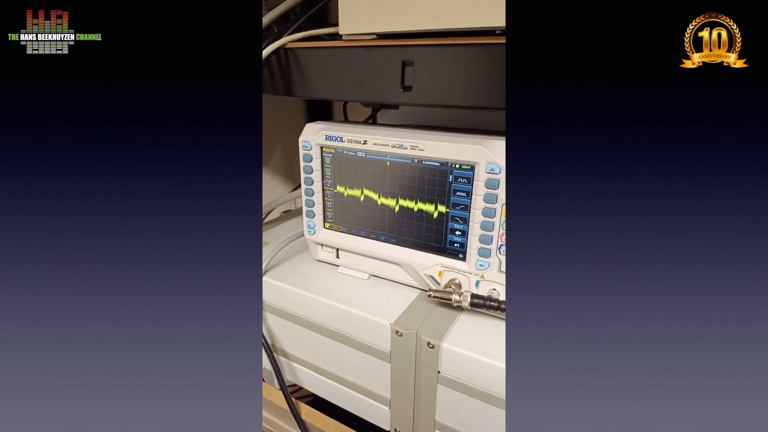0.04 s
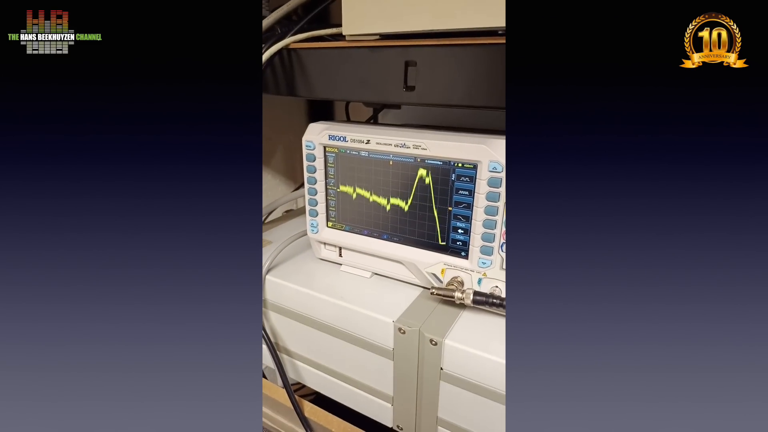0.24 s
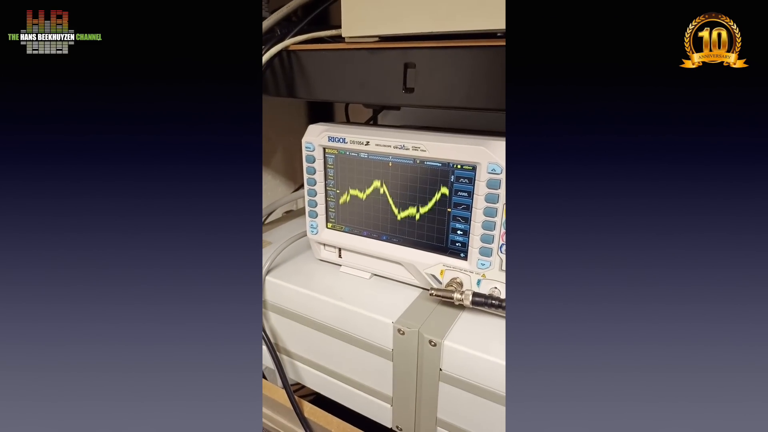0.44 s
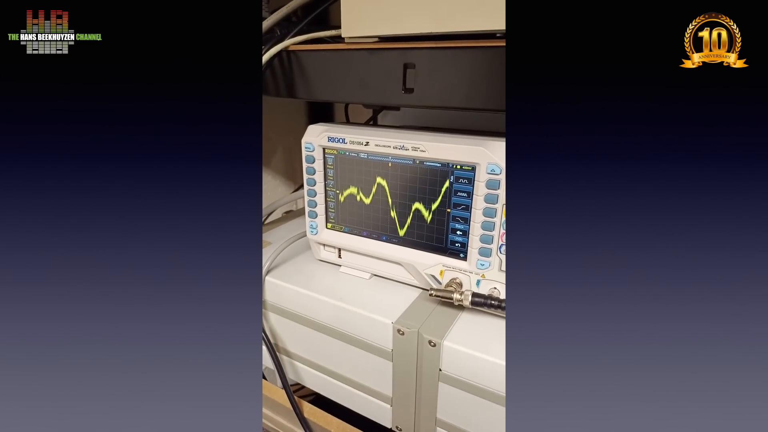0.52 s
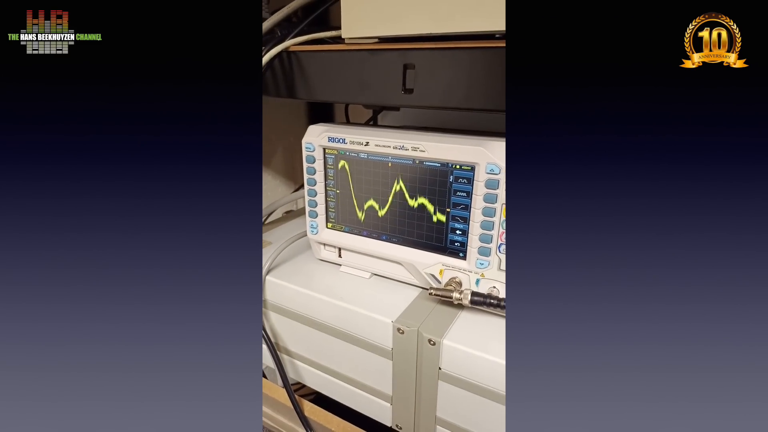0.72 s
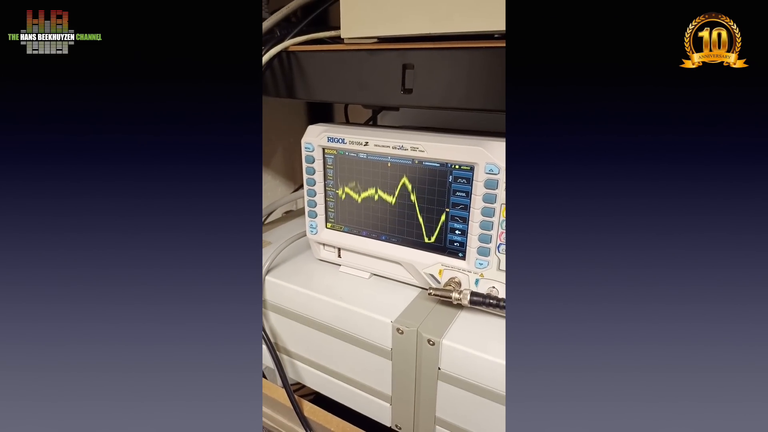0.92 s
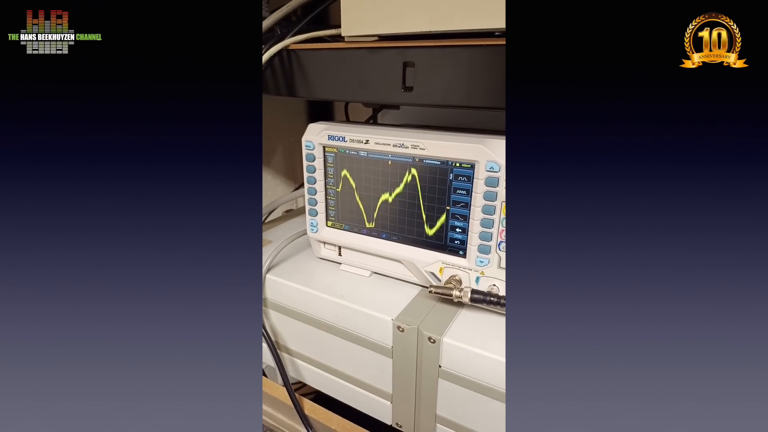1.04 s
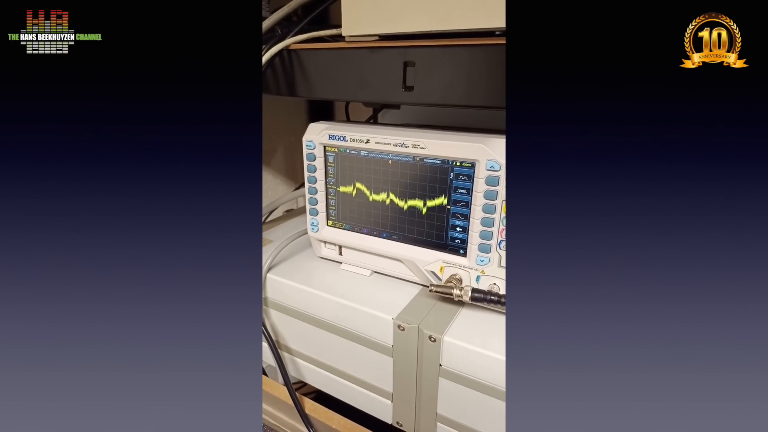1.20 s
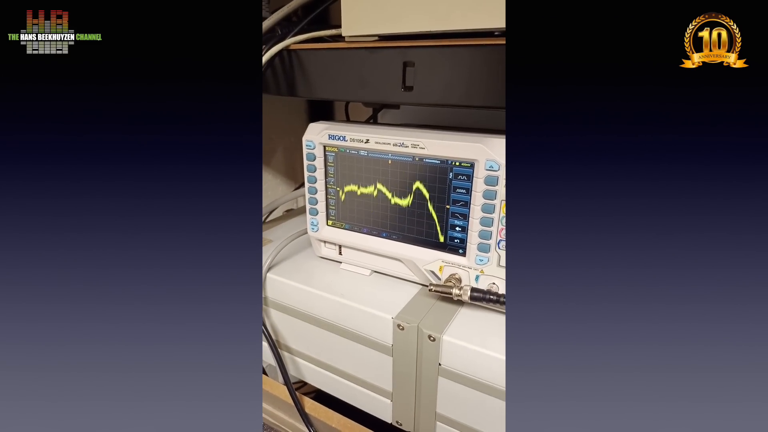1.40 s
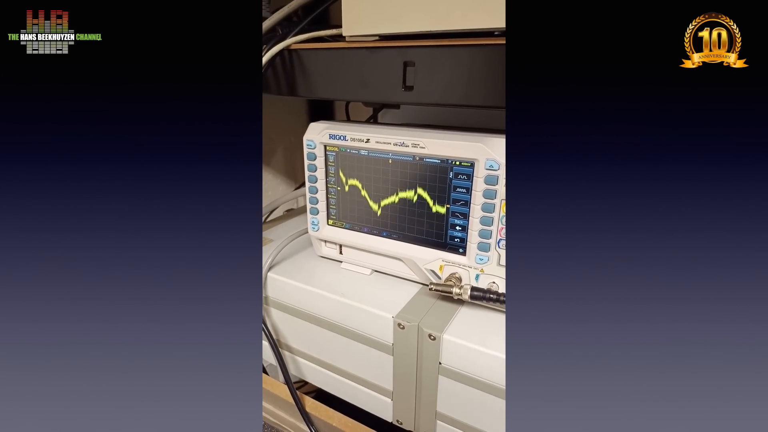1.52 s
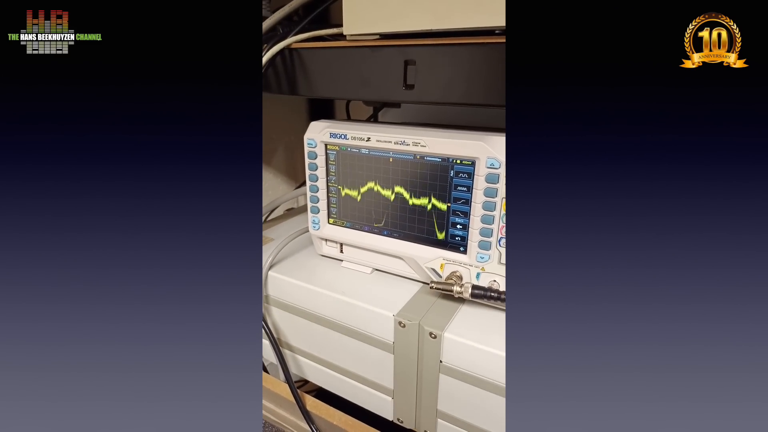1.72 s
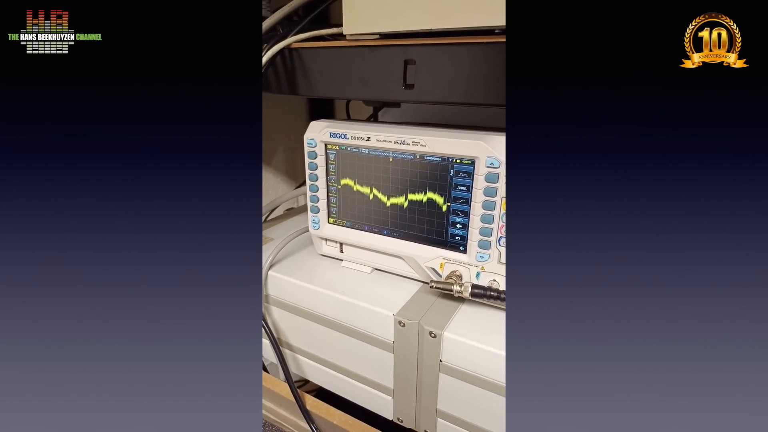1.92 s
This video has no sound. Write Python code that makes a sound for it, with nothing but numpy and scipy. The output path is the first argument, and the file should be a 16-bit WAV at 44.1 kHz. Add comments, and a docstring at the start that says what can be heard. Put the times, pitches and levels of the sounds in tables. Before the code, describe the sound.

A run of dull, hollow knocks near electronic equipment, with fans faintly hissing behind.

```python
"""Knocks among running instruments

A small room, cooling fans hissing and whining steadily behind, one high whistle swelling and fading.
Close to the microphone, eight quick, dull knocks land on a hollow case or bench among electronic
instruments, the first two hardest. Each soft contact sets the same low modes booming, with a faint
scuff, a brief clack and a short room tail. The microphone loses the deep bass."""
import sys
import numpy as np
from scipy import signal
from scipy.fft import rfft, irfft
from scipy.io import wavfile

SR = 44100
rng = np.random.default_rng(int(sys.argv[2]) if len(sys.argv) > 2 else 0)


def to_wav(s):
    """Save 16-bit WAV."""
    ch = np.atleast_2d(s).T  # columns
    pcm = np.round(np.clip(ch, -1, 1) * 32767)  # PCM
    wavfile.write(sys.argv[1], SR, pcm.astype(np.int16))


N = 85995

# Air rushing through the fans: f/Hz, relative level/dB
AIR_SPECTRUM = [(25, -3), (60, -6), (120, -0.5), (250, -4), (400, 3.5), (560, -4), (850, 0.5), (1100, -4),
                (1900, -4.5), (3000, -7.5), (4500, -8), (6200, -12), (7200, -25.5), (8200, -33.5),
                (9500, -33.5), (10300, -22), (11800, -32)]
# Steady whine of the fans: f/Hz, level/dB
FAN_TONES = [(419, -62.5), (764.6, -63), (875, -73), (1313, -68), (1532, -98), (1686, -80), (2297, -69.5),
             (3063, -77), (3957, -96), (7452, -93), (10066, -93), (11521, -91.5)]
# Swell of the fan whistle: t/s, level/dB
WHISTLE_SWELL = [(0, -70.5), (.3, -69.5), (.45, -76.5), (0.622, -67), (0.798, -75), (0.949, -74),
                 (1.079, -69.5), (1.23, -68.5), (1.348, -72.5), (1.95, -77.5)]
# Knocks: t/s, strength/dB, contact softness/ms, first touch/dB re the knock, scuff/dB, ring time factor
KNOCKS = [(0.2015, 14.5, 0.4, -15.5, -41.5, 0.95), (0.4166, 9.5, 0.63, -8, -47.5, 0.79),
          (0.5947, -1.1, 0.52, -16, -53.5, 1.14), (0.7804, -0.3, 0.4, -24.5, -51, 1.13),
          (0.9684, 0, 0.43, -18, -57, 1.06), (1.1592, -0.9, 0.49, -24, -59, 1.05),
          (1.348, -0.54, 0.39, -17, -54, 1.05), (1.5526, 1.1, 0.37, -10.5, -51, 1.03)]
# Modes of the hollow body, with the room's lingering bass resonances in the lowest three rows:
# f/Hz, level/dB, t60/s, polarity at the microphone
BODY_AND_ROOM_MODES = [(59.6, -51, 0.65, -1), (79.8, -49, 0.61, -1), (104.2, -54.5, 0.37, -1),
                       (119.4, -16.5, 0.035, 1), (157.9, -21.5, 0.099, -1), (179.73, -13, 0.09, -1),
                       (186, -18, 0.17, 1), (213.9, -30, 0.096, 1), (249.7, -44.5, 0.26, -1),
                       (323.7, -41.5, 0.2, 1), (390.4, -33.5, 0.14, 1), (466.3, -24, 0.082, -1),
                       (502.2, -26, 0.088, 1), (684, -35.5, 0.095, 1), (790, -32.5, 0.12, -1)]
# Rub of the surface: f/Hz, relative level/dB
SCUFF_SPECTRUM = [(120, -15), (300, 10), (750, 1.5), (1300, -8.5), (2200, -12.5), (4000, -17.5),
                  (6300, -17.5), (8500, -38.5), (12000, -36.5)]
# Dense upper modes of the body: f/Hz, relative level/dB
CLACK_SPECTRUM = [(200, -26), (600, -0.5), (850, -16), (1400, -14), (2200, -26.5), (5000, -41.5),
                  (8000, -77)]
# Colour of the room's tail: f/Hz, relative level/dB
ROOM_SPECTRUM = [(50, -25.5), (90, -2), (170, -14.5), (260, 15.5), (500, 0.5), (900, -0.5), (3000, -3)]


def from_db(db):
    """Decibels to gain."""
    return 10 ** (np.asarray(db) / 20)


def rms_one(x):
    """Scale to an rms of 1."""
    return x / np.sqrt(np.mean(x ** 2) + 1e-20)


def coloured(spectrum):
    """Noise with a given spectrum, rms 1."""
    hz, db = np.transpose(spectrum)
    bin_hz = np.maximum(np.arange(N // 2 + 1) * SR / N, 1)
    gain = from_db(np.interp(np.log(bin_hz), np.log(hz), db))
    return rms_one(irfft(rfft(rng.standard_normal(N)) * gain, N))


def drift(rate_hz):
    """Slow random wander, rms 1."""
    r = np.exp(-2 * np.pi * rate_hz / SR)
    wander = signal.lfilter([1], [1, -2 * r, r * r], rng.standard_normal(N + SR))
    return rms_one(wander[SR:])


def dying(age, t60):
    """Exponential decay that starts at age 0."""
    return (age >= 0) * np.exp(-np.log(1000) * np.maximum(age, 0) / t60)


def fan_tone(hz, flicker=0.35, width_hz=13.2):
    """One thin fan tone, slightly unsteady in level and phase, rms 1."""
    waver = 1 + flicker * (drift(width_hz) + 1j * drift(width_hz))
    cycles = hz * np.arange(N) / SR + rng.random()
    return rms_one(np.real(waver * np.exp(2j * np.pi * cycles)))


def fans(air_db=-57, whistle_hz=3517):
    """Cooling fans in the background: steady air noise and whine, and a whistle that comes and goes."""
    swell_db = np.interp(np.arange(N) / SR, *np.transpose(WHISTLE_SWELL))
    whistle = from_db(swell_db) * fan_tone(whistle_hz)
    air = from_db(air_db) * coloured(AIR_SPECTRUM)
    whine = sum(from_db(db) * fan_tone(hz) for hz, db in FAN_TONES)
    return air + whine + whistle


def push(onset, soft_ms):
    """A bell-shaped contact force of unit impulse; the softer, the duller."""
    age_ms = (np.arange(N) / SR - onset) * 1000
    bell = np.exp(-.5 * (age_ms / soft_ms) ** 2)
    return bell / bell.sum()


def ring(force, hz, t60):
    """One mode: a unit impulse sets a sine of height 1 ringing."""
    r = np.exp(-np.log(1000) / (t60 * SR))
    w = 2 * np.pi * hz / SR
    return signal.lfilter([0, np.sin(w)], [1, -2 * r * np.cos(w), r * r], force + 1e-18)


def knocks(touch_lead_s=0.00867, touch_soft_ms=1.13):
    """A light first touch, then the knock, drive the body's modes and the room's bass resonances."""
    boom = np.zeros(N)
    for onset, strength_db, soft_ms, touch_db, _, ring_factor in KNOCKS:
        touch = from_db(touch_db) * push(onset - touch_lead_s, touch_soft_ms)
        force = from_db(strength_db) * (touch + push(onset, soft_ms))
        for hz, mode_db, t60, polarity in BODY_AND_ROOM_MODES:
            boom += polarity * from_db(mode_db) * ring(force, hz, t60 * ring_factor)
    return boom


def scuffs(delay_s=0.0012, rise_s=0.005, hold_s=0.036, t60=0.11):
    """A faint rub of the surface rides on each knock: rise, hold, release."""
    envelope = np.zeros(N)
    for onset, _, _, _, scuff_db, _ in KNOCKS:
        age = np.arange(N) / SR - onset - delay_s
        rise = np.clip(age / rise_s, 0, 1)
        release = dying(np.maximum(age - hold_s, 0), t60)
        envelope += from_db(scuff_db) * rise * release
    return envelope * coloured(SCUFF_SPECTRUM)


def clacks(gain_db=-47, delay_s=0.0035, t60=0.026, top_hz=2200):
    """The body's dense upper modes die at once; only hard knocks lift them above the hiss."""
    envelope = np.zeros(N)
    for onset, strength_db, *_ in KNOCKS:
        age = np.arange(N) / SR - onset - delay_s
        envelope += from_db(1.13 * strength_db) * dying(age, t60)   # grows faster than the force
    dull = signal.butter(4, top_hz, fs=SR, output="sos")
    return from_db(gain_db) * signal.sosfilt(dull, envelope * coloured(CLACK_SPECTRUM))


def room(sound, gain_db=-25.5, delay_s=0.0091, t60=0.3):
    """Short diffuse tail of a small, furnished room."""
    tail = coloured(ROOM_SPECTRUM) * dying(np.arange(N) / SR - delay_s, t60)
    tail /= np.sqrt(np.sum(tail ** 2))
    return from_db(gain_db) * signal.fftconvolve(sound, tail)[:N]


def scene():
    """From one spot in the room: knocks close by, their tail, and the fans behind."""
    struck = knocks() + clacks() + scuffs()
    return (struck + room(struck) + fans())[None]


def record(dry, low_cut_hz=60, high_cut_hz=12100):
    """A single microphone that loses the deep bass; the top is cut steeply."""
    low_cut = signal.butter(2, low_cut_hz, "high", fs=SR, output="sos")
    high_cut = signal.ellip(12, .1, 80, high_cut_hz, fs=SR, output="sos")
    return signal.sosfilt(high_cut, signal.sosfilt(low_cut, dry))


dry = scene()
out = record(dry)
to_wav(out)
```